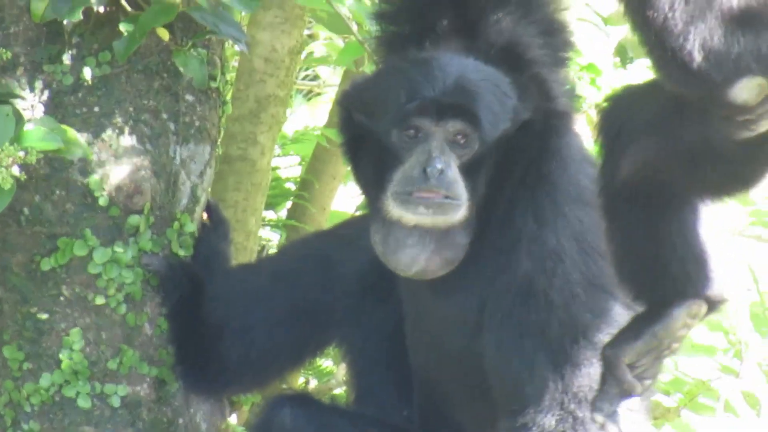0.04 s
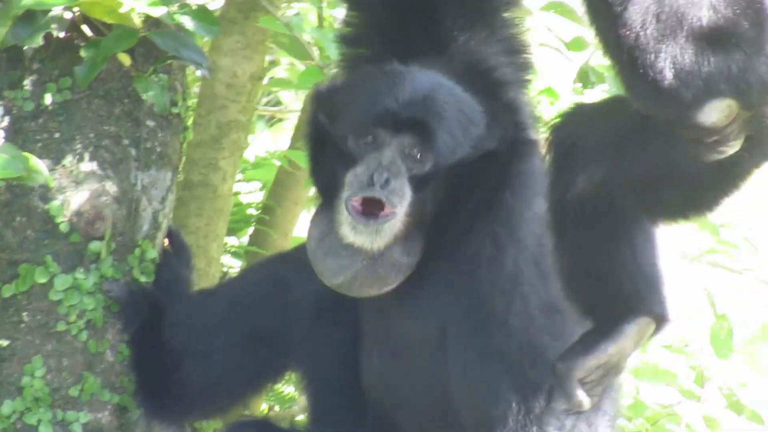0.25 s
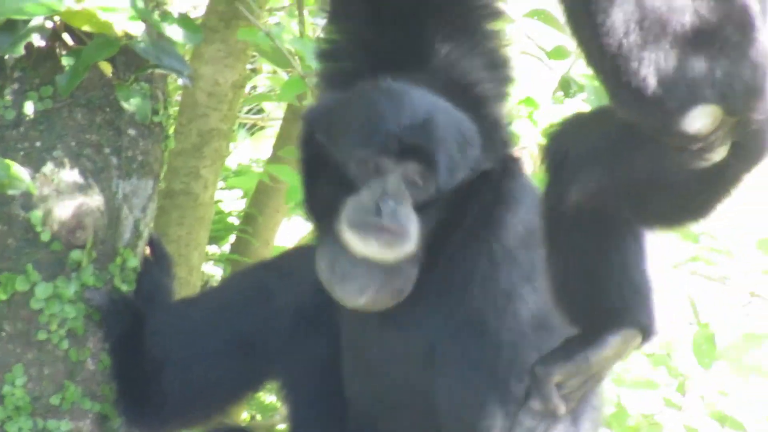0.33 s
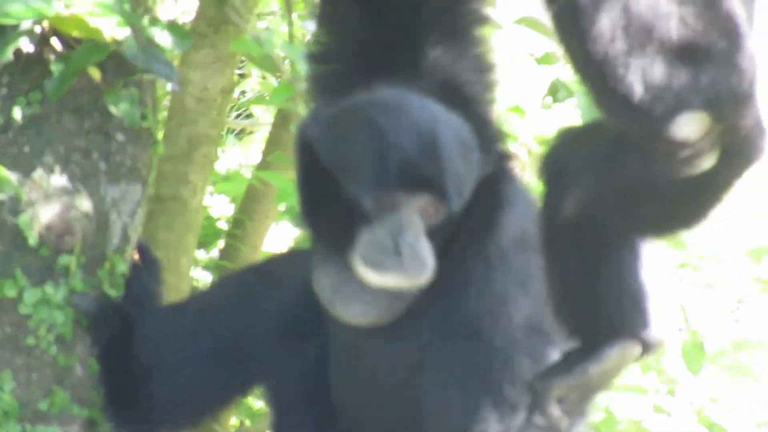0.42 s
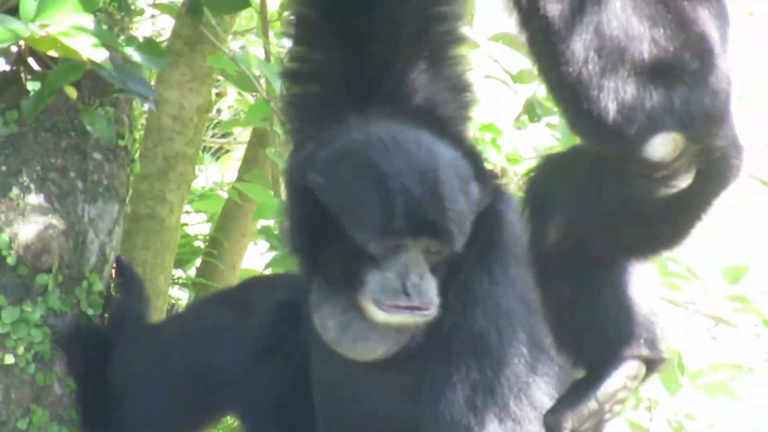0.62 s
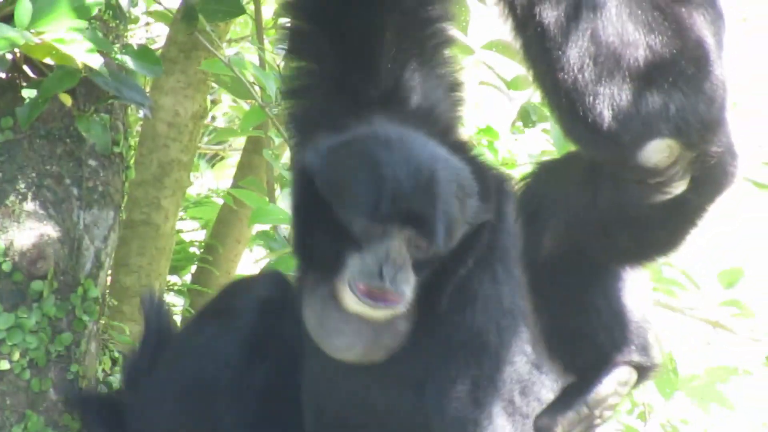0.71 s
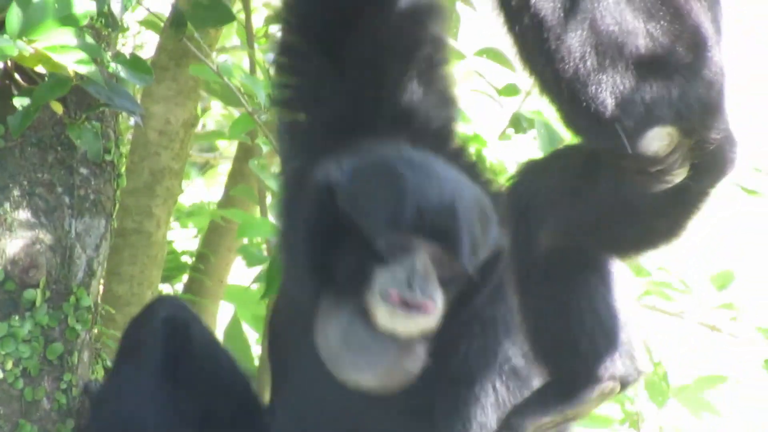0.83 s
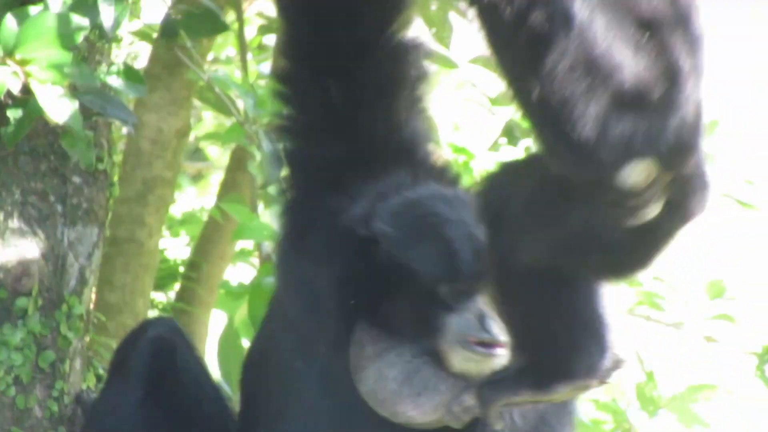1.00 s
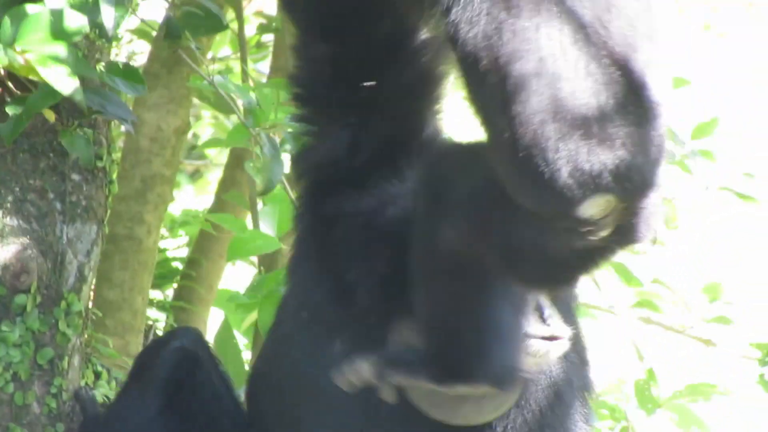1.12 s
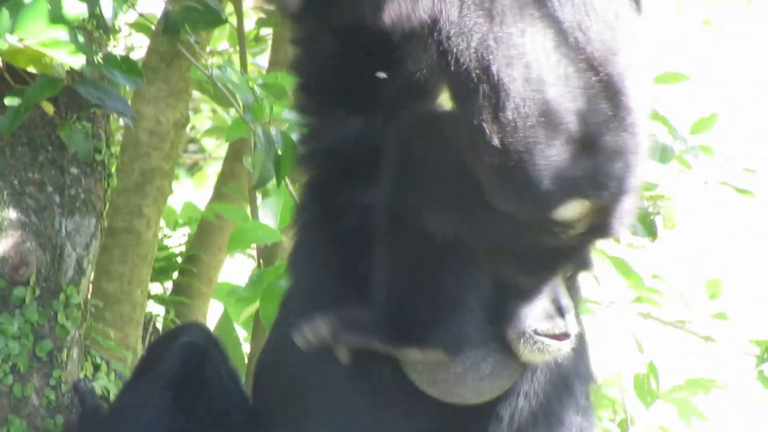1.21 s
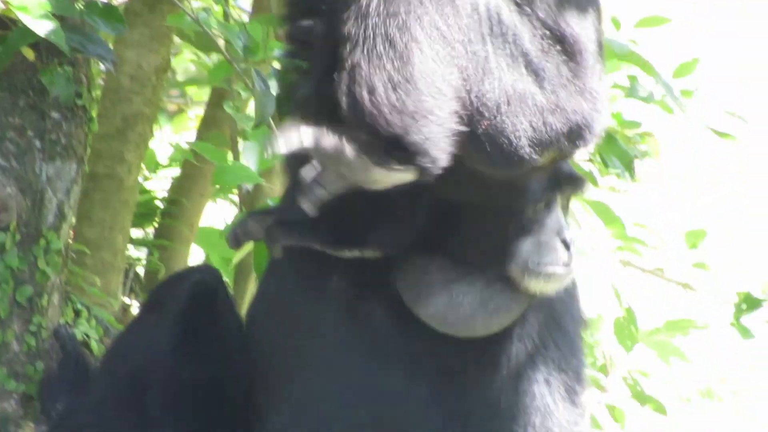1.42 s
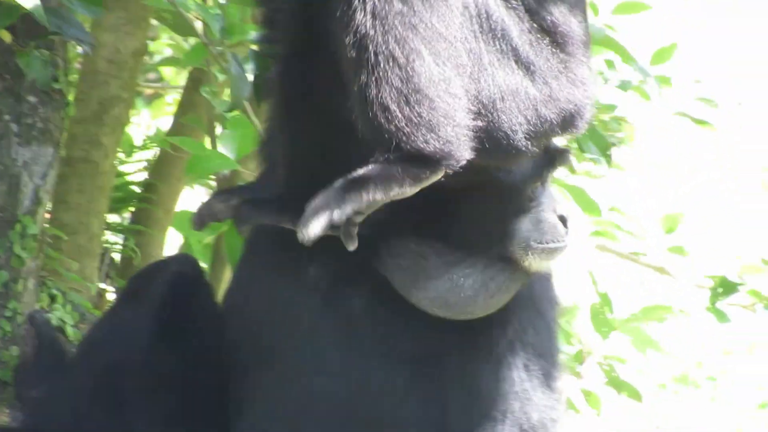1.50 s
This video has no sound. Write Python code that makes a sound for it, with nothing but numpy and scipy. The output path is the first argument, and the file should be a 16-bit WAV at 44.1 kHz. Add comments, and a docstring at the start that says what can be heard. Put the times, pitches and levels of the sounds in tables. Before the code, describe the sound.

Apes bark in short, harsh honks outdoors, with light wind thumping the microphone.

```python
"""Two siamangs bark in the trees: short honks that arch in pitch, one ape round-toned, the other harsh.
Each bark is a stack of harmonics sweeping through throat resonances, clean at the crest and raspy
at the edges. Their throat sacs boom between the barks and the enclosure echoes.
Air buffets the microphone in low, uneven thumps over a bed of distant rumble and faint outdoor hiss."""
import sys
import numpy as np
from scipy import signal
from scipy.fft import rfft, irfft, next_fast_len
from scipy.io import wavfile
from scipy.ndimage import map_coordinates

SR = 44100
rng = np.random.default_rng(int(sys.argv[2]) if len(sys.argv) > 2 else 0)


def file_out(sig):
    """Save sig as 16-bit WAV at sys.argv[1]."""
    # one column per channel
    cols = np.atleast_2d(sig).T
    # limit, then scale
    lim = np.clip(cols, -1, 1)
    pcm = np.round(lim * 32767).astype(np.int16)
    wavfile.write(sys.argv[1], SR, pcm)


N = 68355

# EQ of the distant rumble, the outdoor hiss and the buffeting (frequency [Hz], gain [dB])
DISTANT_EQ = [(30, -6), (60, 6), (200, -20), (500, -24), (1500, -48)]
AIR_EQ = [(880, -12), (1500, 1.5), (2160, 2), (3600, -5.5), (6810, -7), (14200, -20), (15000, -14)]
BUFFET_EQ = [(20, -25), (50, -9), (100, 0.5), (180, -0.5), (300, -3), (450, -12), (700, -23.5), (1200, -22),
             (2500, -84), (6000, -93)]
# fader ride of the buffeting (time [s], relative level [dB])
BUFFET_RIDE = [(0, -42), (.04, -43.5), (.1, -40), (.128, -45.5), (.16, -45), (.29, -44), (.32, -27.5),
               (.36, -45), (.39, -30), (.44, -35.5), (.53, -45), (.57, -31), (.65, -35), (.7, -26.5),
               (.73, -34), (.8, -30), (.85, -26.5), (.9, -40), (1.07, -45.5), (1.17, -39.5), (1.22, -24),
               (1.26, -35), (1.295, -28), (1.33, -56), (1.41, -59), (1.44, -32), (1.55, -39)]
# single thumps of air (time [s], peak [dB], pitch [Hz], width [s])
AIR_THUMPS = [(.009, -19.5, 225, 0.0012), (.064, -10.5, 121.1, 0.0031), (.067, -18.5, 304, 0.0013),
              (0.388, -24, 162, 0.0086), (.5, -17, 334, 0.0014), (.567, -12, 230, 0.00096),
              (0.61, -24, 420, 0.0024), (0.624, -14.5, 394, 0.00062), (.63, -11.5, 318, 0.00094),
              (.663, -17.5, 448.6, 0.00076), (0.672, -16, 150, .003), (0.682, -13.5, 323, .002),
              (.695, -15.5, 194, 0.0052), (.695, -10, 650, 0.00081), (.704, -9, 750, 0.00036),
              (0.707, -7, 302, 0.00083), (0.739, -11.5, 350, 0.001), (0.748, -18.5, 590, 0.00095),
              (1.2, -23, 149, 0.0025), (1.219, -13, 183, 0.0025), (1.289, -31.5, 170, .005)]
# decay of the enclosure (frequency [Hz], time to fall 60 dB [s])
REVERB_DECAY = [(250, 0.21), (550, 0.77), (1100, 0.78), (2500, 0.78), (7000, 0.26), (14000, .25)]
# colour of its tail (frequency [Hz], gain [dB])
REVERB_EQ = [(250, -1), (550, 1), (1150, -3.5), (2000, -6.5), (7000, 0), (14000, -2)]
# throat-sac booms (start [s], end [s], pitch [Hz], level [dB])
SAC_BOOMS = [(0.128, 0.206, 291.8, -29.5), (0.191, 0.259, 262.9, -22), (0.752, 0.796, 266.2, -16),
             (0.938, 0.983, 291, -23), (1.083, 1.123, 288, -23)]
# bark cues (crest [s], swell [s], fade [s], top pitch [Hz], pitch sag [octaves/s], relative level [dB],
# fundamental trim [dB], overtone trim [dB], treble drive [dB], sizzle drive [dB],
# mouth resonance [Hz], ape [0 round, 1 harsh])
BARK_CUES = [(.220, 0.019, 0.029, 662.3, 9.74, -9, -5.5, -0.5, 5, 3.5, 2700, 0),
             (.318, 0.017, 0.032, 576, 10.66, -19, -5, 7.5, -3, 9, 6330, 1),
             (0.856, 0.019, .027, 600.3, 14.2, -12, -13, 3.5, 5, 5.5, 3730, 1),
             (.923, 0.018, 0.031, 649.4, 9.65, -12.5, -2.5, -1.5, 7.5, -11, 1937, 0),
             (1.02, 0.017, .028, 554.4, 10.4, -18, -9, 0, 10.5, 2, 4120, 1),
             (1.146, 0.017, 0.013, 523.6, 6, -27.5, -0.5, 4, -1, -3, 2090, 1),
             (1.177, 0.026, .027, 554.6, 12.7, -18.5, -16, 1, 2.5, -2, 4060, 1),
             (1.257, 0.022, 0.025, 539.5, 8, -32, 7, 7, 13, -7, 2074, 1)]
# resonances of each ape's throat, and EQ of the breath (frequency [Hz], gain [dB])
ROUND_THROAT = [(500, 2), (585, 8), (670, -4.5), (900, 25), (1150, -3), (1320, -2), (1450, -10),
                (1650, -50), (1980, -24), (2300, -7), (2600, -25.5), (2870, -4), (3250, -32), (3600, -19),
                (4000, -34.5), (4600, -38), (6500, -38), (9000, -54), (12000, -55), (15000, -71)]
HARSH_THROAT = [(400, 1), (540, 5), (620, 8.5), (800, 5.5), (1000, 5.5), (1200, 0.5), (1500, -20),
                (1750, -28), (2300, -19.5), (2550, -29), (2780, -11.5), (2960, -8.5), (3220, -29.5),
                (3900, -20), (4400, -30), (4900, -21.5), (6200, -27.5), (8400, -35.5), (10500, -45),
                (13000, -55), (15000, -53)]
BREATH_EQ = [(300, -30), (1200, -37), (1700, -3), (2900, -1.5), (3400, -9.5), (6500, -6.5), (9000, -30),
             (12000, -19.5), (15000, -47)]
# how rough a harmonic is (frequency [Hz], base noise share [ratio])
RASP_SHARE = [(600, .035), (1300, .055), (3000, .12), (6000, .25), (12000, .5)]
# how far a harmonic's level wanders on its own (frequency [Hz], depth [ratio])
FLICKER_DEPTH = [(1200, 0.89), (2000, 0.56), (4000, 1)]
# shelves opened by a bark's treble and sizzle drive (frequency [Hz], share of drive [ratio])
TREBLE_SHELF = [(3000, 0), (6000, 0.43)]
SIZZLE_SHELF = [(6500, 0.1), (8500, 0.67)]

ARCH_S = .014  # roundness of the pitch crest
COLLAPSE_AFTER_S, COLLAPSE_OCTAVES_PER_S = 0.0282, 6.5  # the harsh ape's extra drop at a bark's end
EDGE_DB, SWELL_POWER, FADE_POWER = 11, 2.44, 1.88  # effort drop one swell or fade from the crest; curves
OVERTONE_SLOPE, FUND_SLOPE = 1.18, 0.57  # overtones follow the effort more steeply than the fundamental
FUND_LAG_S, BREATH_LAG_S = (0.0027, 0.006), .016  # behind the effort: fundamental (per ape), breath
MOUTH_DB, MOUTH_OCTAVES = 10, 0.053  # height and width of the mouth resonance
JITTER, JITTER_HZ, RASP_HZ, FLICKER_HZ = .004, 400, 330, 45
CLEANEST_S, EDGE_RASP = -0.0059, .9  # rasp grows either side of a point just before the crest
LOUD_DB, SOFT_RASP_PER_DB = -13, .09  # softer barks are raspier


def amp(db):
    """Decibels to gain."""
    return 10 ** (np.asarray(db) / 20)


def unit(x):
    """Scale to rms 1."""
    return x / np.sqrt(np.mean(x ** 2) + 1e-20)


def along(points, hz):
    """Read a curve of (frequency [Hz], value) points on a log axis."""
    f, v = np.transpose(points)
    return np.interp(np.log(hz + 1), np.log(f + 1), v)


def wobble(rate):
    """A smooth random modulator, rate knots a second."""
    return map_coordinates(rng.standard_normal(N // 8), [np.arange(N) * rate / SR], mode="wrap")


def filtered(x, response):
    """Run x through a frequency response."""
    m = next_fast_len(N + SR // 2)
    return irfft(rfft(x, m) * response(np.fft.rfftfreq(m, 1 / SR)), m)[:N]


def noise(eq):
    """Coloured noise of rms 1."""
    return unit(filtered(rng.standard_normal(N), lambda hz: amp(along(eq, hz))))


def outdoor_bed(rumble_db=-47, hiss_db=-53):
    """Steady distant rumble under a faint hiss."""
    return amp(rumble_db) * noise(DISTANT_EQ) + amp(hiss_db) * noise(AIR_EQ)


def buffeting(trim_db=4.5, lump_db=2, lump_hz=110):
    """Air hits the microphone: a lumpy low rumble dotted with single thumps."""
    t = np.arange(N) / SR
    ride = amp(np.interp(t, *np.transpose(BUFFET_RIDE)) + trim_db)
    out = ride * unit(noise(BUFFET_EQ) * amp(lump_db * wobble(lump_hz)))
    for at, db, hz, width in AIR_THUMPS:
        out -= amp(db) * np.exp(-((t - at) / width) ** 2 / 2) * np.cos(2 * np.pi * hz * (t - at))
    return out


def enclosure(x, send_db=-10, predelay_s=.028):
    """The enclosure answers with a diffuse tail that rings longest in the mids."""
    hz, t, spectrum = signal.stft(rng.standard_normal(SR), SR, nperseg=256)
    t60 = along(REVERB_DECAY, hz)[:, None]
    decay = amp(along(REVERB_EQ, hz)[:, None] - 60 * t / t60)
    equal_energy = np.sqrt(2 * np.log(1000) / t60 / SR)
    tail = signal.istft(spectrum * decay * equal_energy, SR, nperseg=256)[1]
    wet = signal.fftconvolve(x, tail)[:N]
    return amp(send_db) * filtered(wet, lambda f: np.exp(-2j * np.pi * f * predelay_s))


def booms(attack_s=0.019, release_s=0.0043, octave_db=-22):
    """The inflated throat sac hums an almost pure, slightly wavering tone."""
    t, out = np.arange(N) / SR, np.zeros(N)
    for start, end, hz, db in SAC_BOOMS:
        gate = (1 + np.tanh((t - start) / attack_s)) * (1 - np.tanh((t - end) / release_s)) / 4
        waver = np.cumsum(0.0055 * wobble(70)) / SR
        phase = 2 * np.pi * hz * (t - start + waver)
        out += amp(db) * gate * np.sqrt(2) * (np.sin(phase) + amp(octave_db) * np.sin(2 * phase))
    return out


def effort(dt, swell, fade):
    """The push behind a bark in dB, rising to 0 at the crest (dt = 0) and falling away."""
    return -EDGE_DB * np.where(dt < 0, abs(dt / swell) ** SWELL_POWER, abs(dt / fade) ** FADE_POWER)


def barks(harmonics=30, breath_db=-31, flicker_db=3):
    """Pitch and effort arch together, sweeping the harmonics through throat and mouth resonances."""
    t, out = np.arange(N) / SR, np.zeros(N)
    tremble, breath_noise = wobble(JITTER_HZ), noise(BREATH_EQ)
    rasp = np.array([wobble(RASP_HZ) + 1j * wobble(RASP_HZ) for _ in range(harmonics)])
    flicker = flicker_db * np.array([wobble(FLICKER_HZ) for _ in range(harmonics)])
    k = np.arange(harmonics)[:, None] + 1
    for (crest, swell, fade, top_hz, sag, db,
         fund_db, over_db, treble, sizzle, mouth_hz, ape) in BARK_CUES:
        near = abs(t - crest) < .1
        dt = t[near] - crest
        arch = sag * (np.hypot(dt, ARCH_S) - ARCH_S)
        collapse = ape * COLLAPSE_OCTAVES_PER_S * np.maximum(dt - COLLAPSE_AFTER_S, 0)
        pitch = top_hz * 2 ** (-arch - collapse) * (1 + JITTER * tremble[near])
        phase = 2 * np.pi * np.cumsum(pitch) / SR
        hz = k * pitch

        # Tone, in dB: the second harmonic rides the effort directly.
        push = effort(dt, swell, fade)
        fundamental = FUND_SLOPE * effort(dt - FUND_LAG_S[ape], swell, fade) + fund_db
        mouth = MOUTH_DB * np.exp(-(np.log2(hz / mouth_hz) / MOUTH_OCTAVES) ** 2)
        shelves = treble * along(TREBLE_SHELF, hz) + sizzle * along(SIZZLE_SHELF, hz)
        wander = flicker[:, near] * along(FLICKER_DEPTH, hz)
        overtones = OVERTONE_SLOPE * push + over_db + mouth + shelves + wander
        throat = along(HARSH_THROAT if ape else ROUND_THROAT, hz)
        level = np.select([k == 1, k == 2], [fundamental, push], overtones) + throat

        # Grit: each harmonic trades pure tone for a narrow band of noise.
        edges = EDGE_RASP * abs(dt - CLEANEST_S) / fade
        softness = SOFT_RASP_PER_DB * (LOUD_DB - db - over_db)
        share = np.clip(along(RASP_SHARE, hz) * np.exp(edges + softness), 0, 1)
        grit = np.sqrt(1 - share ** 2) + share * rasp[:, near] / np.sqrt(2)
        partials = grit * np.exp(1j * (k * phase + 2 * np.pi * rng.random((harmonics, 1))))
        voice = np.sqrt(2) * np.sum(amp(level) * partials.imag, axis=0)

        # Breath: turbulence that pulses with each cycle of the voice.
        breath_gain = amp(breath_db + over_db + treble + effort(dt - BREATH_LAG_S, swell, fade))
        breath = breath_gain * breath_noise[near] * (1 + np.cos(phase))
        out[near] += amp(db) * (voice + breath)
    return out


def scene():
    """Mono mix: the apes feed the reverb; the buffeting and the outdoor bed stay dry."""
    apes = barks() + booms()
    return (apes + enclosure(apes) + buffeting() + outdoor_bed())[None]


def record(dry):
    """A brick-wall high cut on the whole mix."""
    cutoff_hz = 15300
    return filtered(dry[0], lambda hz: hz < cutoff_hz)[None]


dry = scene()
out = record(dry)
file_out(out)
```